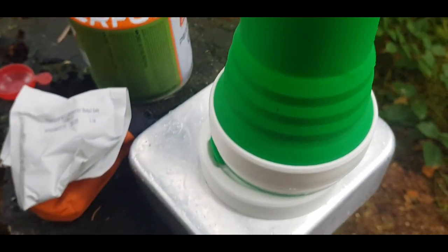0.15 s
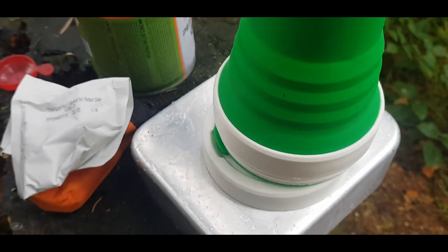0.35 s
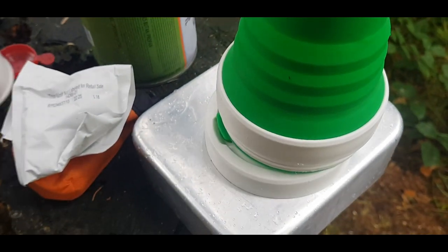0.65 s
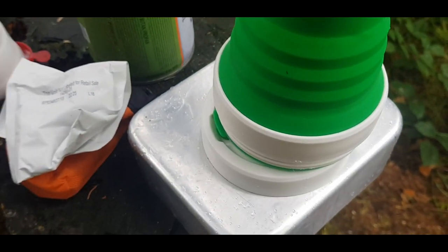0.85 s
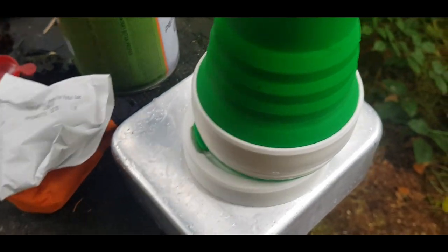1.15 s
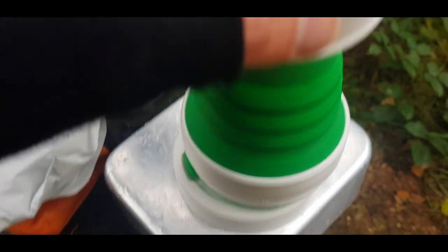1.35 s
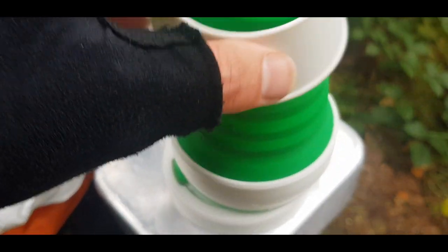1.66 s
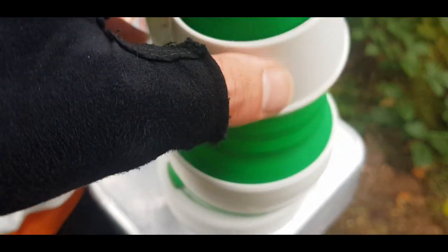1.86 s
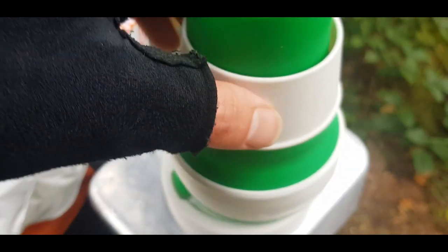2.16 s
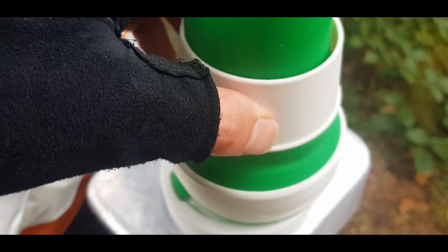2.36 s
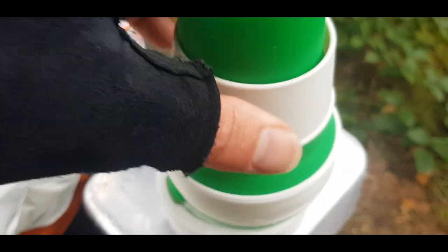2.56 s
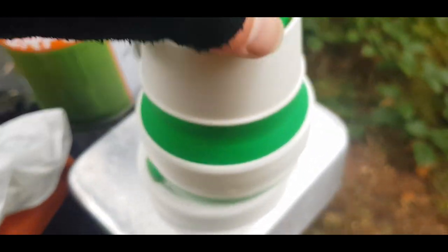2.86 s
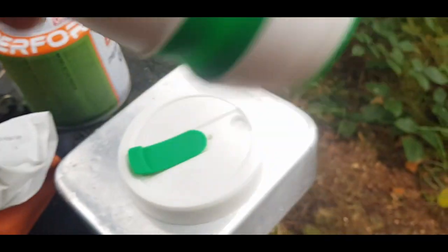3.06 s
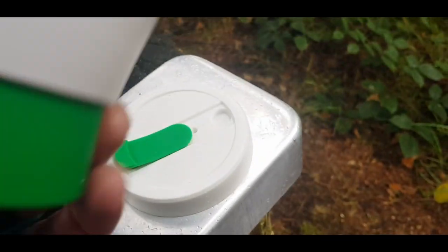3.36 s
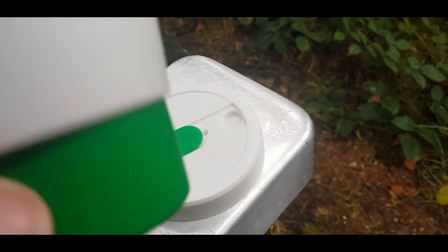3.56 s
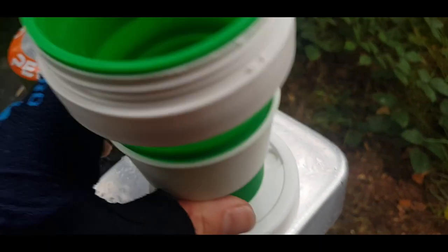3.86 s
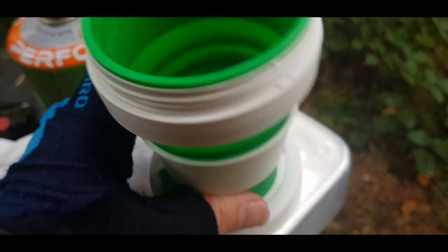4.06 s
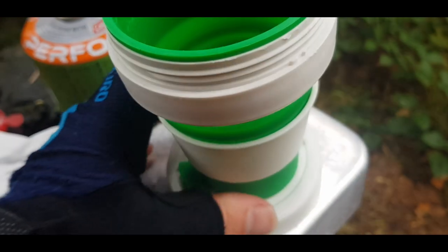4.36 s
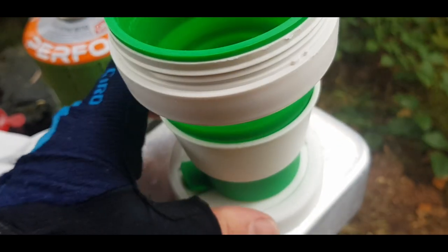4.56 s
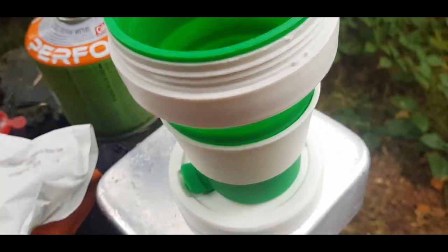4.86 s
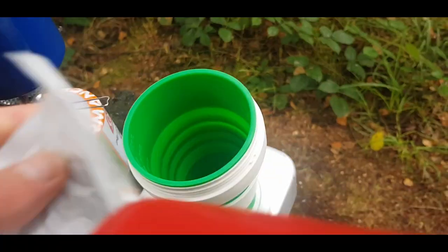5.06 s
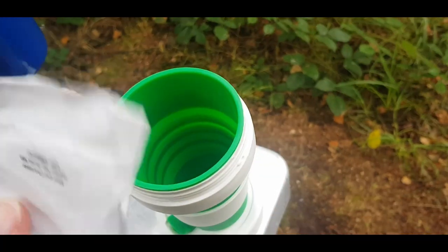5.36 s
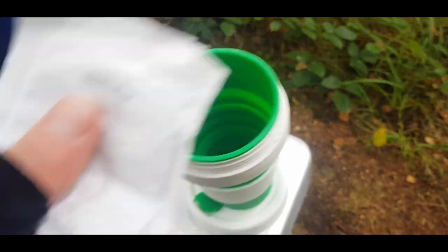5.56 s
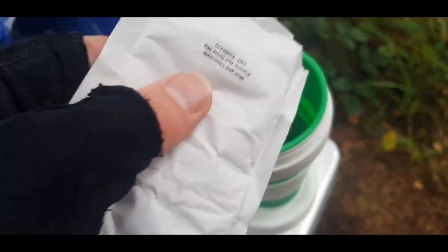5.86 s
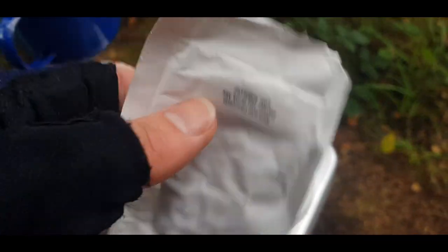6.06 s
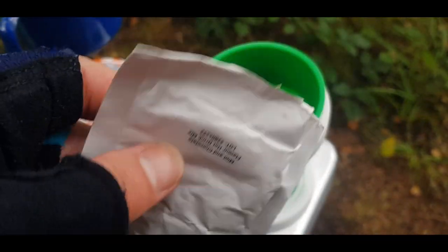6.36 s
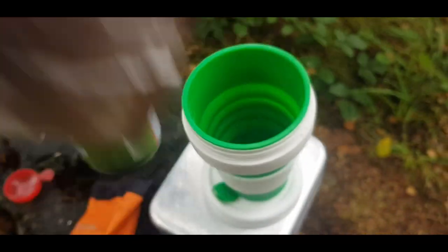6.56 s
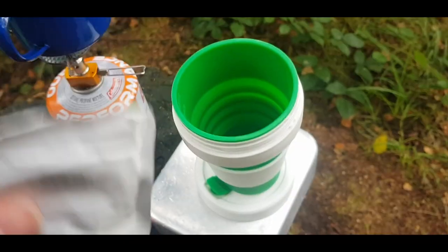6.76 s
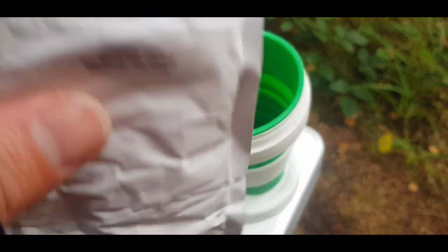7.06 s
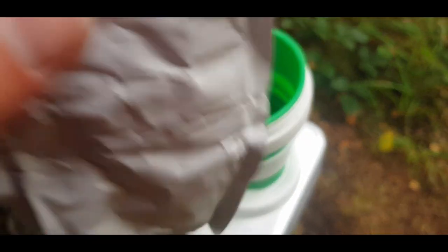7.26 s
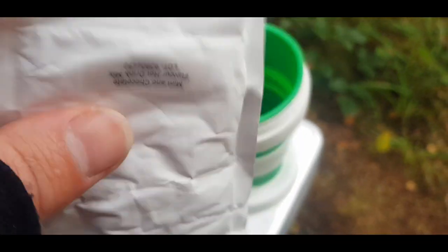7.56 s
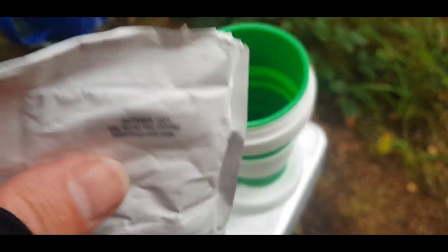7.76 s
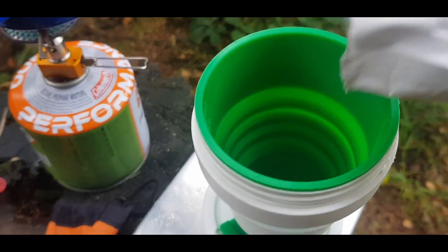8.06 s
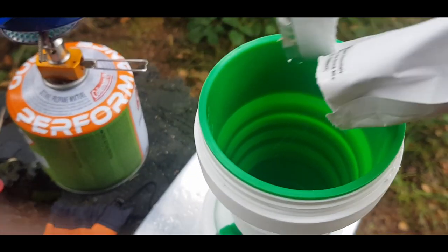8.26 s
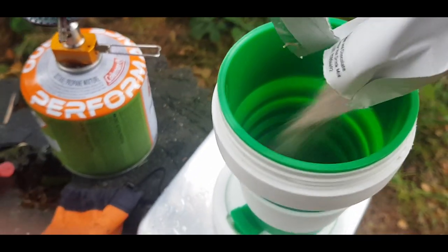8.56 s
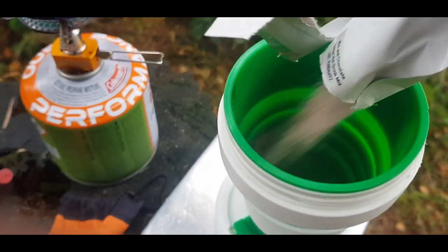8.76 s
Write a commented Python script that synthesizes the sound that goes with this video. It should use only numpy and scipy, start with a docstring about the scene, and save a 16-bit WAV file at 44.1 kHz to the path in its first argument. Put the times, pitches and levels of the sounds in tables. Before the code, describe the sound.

A folding plastic cup pops open and is set down with hollow knocks, then a paper sachet crackles sharply, is shaken and its powder poured, outdoors.

```python
"""Folding cup and paper sachet outdoors

Beside a faintly hissing stove, a folding cup opens with hollow pops and is set down: damped sines and noise ticks.
A paper sachet snaps and crinkles, is shaken so its powder swishes, and is poured out: short swings and noise grains.
Noise makes a distant rumble, a light breeze and dull hand bumps; a thin whistle comes and goes in spells.
Two close microphones hear each crackle at slightly different moments; the sound drops out briefly before the pour."""
import sys
import numpy as np
from scipy import signal
from scipy.fft import rfft, irfft
from scipy.io import wavfile
from scipy.ndimage import uniform_filter1d

SR = 44100
rng = np.random.default_rng(int(sys.argv[2]) if len(sys.argv) > 2 else 0)


def store_wav(level_fs):
    """Save 16-bit WAV to argv[1]."""
    pcm = np.round(np.clip(np.atleast_2d(level_fs), -1, 1) * 32767)
    wavfile.write(sys.argv[1], SR, pcm.T.astype(np.int16))


N = 393372
TIME = np.arange(N) / SR  # seconds

# Colour of the distant rumble: (frequency [Hz], level per Hz [dB])
RUMBLE_COLOUR = [(15, -96), (25, -24), (46, -10.5), (67, -4), (112, -8), (136, -1.5), (168, 0), (263, -7),
                 (306, -8.5), (366, -14), (647, -19.5), (786, -16.5), (900, -28.5), (1170, -30),
                 (1980, -120)]
# How wide the rumble is: (frequency [Hz], side relative to middle [dB])
RUMBLE_SIDE = [(30, -7), (60, -23), (110, -14), (180, -18.5), (380, -9.5), (800, -8)]
# Colour of the stove's hiss: (frequency [Hz], level per Hz [dB])
HISS_COLOUR = [(500, -18), (900, -1), (1400, 3), (2300, 0.5), (3500, -3), (5000, -4.5), (7000, -10),
               (8200, -6.5), (9200, -9.5), (12000, -11), (16000, -17.5)]
RUMBLE_DB, HISS_DB = -51, -56.5

# Spells of the thin background whistle: (time [s], hold [s], level [dB], pitch [Hz])
WHISTLE_SPELLS = [(0, 1.16, -58, 5570), (1.486, 0.24, -63.5, 5620), (2.149, 0.35, -61.5, 5560),
                  (2.717, 0.54, -62.5, 5700), (4.022, .6, -59.5, 5570), (4.849, 3.13, -58, 5760)]
# Breathy tones of the whistle: (multiple of its pitch [ratio], width [Hz], level [dB])
BREATHY_TONES = [(1, 520, -4.5), (1.42, 497, -23.5)]
WHISTLE_FADE_DB_PER_S = 54

# Soft bumps of the hands: (time [s], level [dB], pitch [Hz], length [s])
HAND_BUMPS = [(4.385, -48.5, 65, 0.021), (5.142, -38, 240, 0.01), (5.137, -48, 75, 0.033),
              (5.345, -40.5, 65, 0.025), (5.82, -50, 75, 0.013), (6.493, -47, 54.7, 0.028),
              (7.64, -46, 65, 0.015), (7.74, -46.5, 55, 0.026), (8.877, -53.5, 327, 0.037)]

# Folds of the cup popping open:
# (time [s], hollow level [dB], hollow pitch [Hz], wall level [dB], tick level [dB], tick pitch [Hz])
CUP_POPS = [(1.436, -43.5, 756, -58, -54, 1500), (1.703, -33.5, 640, -41, -31.5, 1390),
            (2.0762, -31.5, 597, -39, -35, 2600), (2.077, -46, 513, -53, -42, 5560),
            (2.079, -31.5, 460, -56, -27.5, 1640), (3.142, -49, 800, -49, -34, 5200),
            (3.1438, -15.5, 665, -25, -28, 5400)]
# Ringing of the cup's plastic wall: (frequency [Hz], level [dB], time to fall 60 dB [s])
WALL_TONES = [(824, -3, 0.031), (960, -4.5, 0.014), (1310, -19, 0.036), (1960, -15.5, 0.033),
              (2440, -21, 0.03), (2850, -21, 0.037)]
# The cup set down on its lid on a metal tin:
# (time [s], hollow level [dB], hollow pitch [Hz], tin level [dB], tick level [dB], tick pitch [Hz])
CUP_TOUCHES = [(4.0938, -18, 548, -25, -34, 2220), (4.097, -25, 580, -55, -43, 3960),
               (4.136, -33, 650, -55, -60, 2000), (4.279, -30.5, 620, -58, -60, 2000),
               (4.315, -35, 650, -51, -60, 2000)]
# Ringing of lid and tin: (frequency [Hz], level [dB], time to fall 60 dB [s])
TIN_TONES = [(792, -2, 0.062), (1020, -15, .025), (1130, -15, 0.046), (1465, -5, 0.058), (1590, -8, 0.095),
             (1660, -9, 0.06), (1820, -16, 0.051), (1990, -21, .04), (2420, -22, 0.095), (2800, -19, 0.044),
             (3970, -15.5, 0.016)]
# Gloved fingers sliding on the cup: (time [s], level [dB], length [s])
FINGER_SCUFFS = [(1.454, -59, 0.013), (1.674, -63, 0.03), (1.912, -55, 0.014), (2.12, -57.5, 0.067),
                 (3.14, -54.5, 0.036), (3.221, -53, 0.0087), (3.272, -59.5, 0.067), (3.423, -54, 0.02),
                 (3.546, -50, 0.011), (4.245, -50.5, 0.017), (4.334, -55.5, 0.024)]
# Colour of the hollow cup: (frequency [Hz], level per Hz [dB])
HOLLOW_COLOUR = [(300, -18), (520, -1.5), (660, -1), (820, 1), (1100, -14.5), (2000, -12), (4000, -30),
                 (9000, -34)]

# Where the hand holds the sachet: (time [s], lean to the left [dB], delay of the right ear [ms])
HAND_PLACE = [(5.0, -1, 0.25), (5.35, -3, 0.25), (5.65, -4, 0.23), (5.85, -5, 0.17), (6.12, -10, -.17),
              (6.57, -5, -0.22), (6.67, 3.5, 0), (6.76, -9.5, -0.14), (7.8, -9, -.13), (7.86, 6, 0.14),
              (8.92, -1, .12)]
# Creases that snap: (time [s], level [dB], pitch [Hz],
# splinters relative to the snap [dB], lean to the left relative to the hand [dB])
CREASE_SNAPS = [(4.997, -21.5, 4170, 11.5, 5), (5.012, -10, 2130, -24, -0.5), (5.085, -9, 2360, -13, -7),
                (5.099, -23, 4500, 12, 4), (5.145, -18, 3900, -4, -7), (5.1842, -2.5, 3240, -5.5, 7),
                (5.278, -16, 4000, -5, 0), (5.285, -10.5, 3000, -20, -17), (5.327, -2.5, 2160, -24, -6),
                (5.337, -11, 2600, -9, 18), (5.375, -22, 8000, -1, 4), (5.3836, -1.5, 3640, -10, 3),
                (5.3937, -20, 4500, -7, 7), (5.563, -26, 4200, 1, -2), (5.606, -32, 3000, -5, 2),
                (5.642, -17, 1590, -2, 3), (5.7128, -21.5, 3800, -3, -4), (5.759, -29, 5000, 11, -4),
                (5.795, -20, 3000, 0, -2), (5.828, -8.5, 2200, -1, 3), (5.836, -19, 4000, 2, -4),
                (5.868, -18, 4500, -15, 0), (5.9606, -29, 2600, 0, -3), (6.123, -9.5, 5070, -1, 3),
                (6.124, -13.5, 1650, -5, 9), (6.235, -14.5, 4850, 1, 0), (6.258, -26, 5000, 2, 5),
                (6.567, -27, 1300, -10, -2), (7.0338, -16.5, 3400, -2.5, 1), (7.122, -29, 2010, -8, 0),
                (7.295, -22, 2500, 0, 4), (7.536, -22, 1140, -2, 7), (8.4125, -28, 2300, -4, 2)]
# While the sachet is in the hand, small creases give way: (start [s], end [s])
HELD = (4.996, 7.85)
CREASES_PER_S, CREASE_DB, CREASE_SPREAD_DB = 5, -32, 2.0
CREASE_HZ, CREASE_SPLINTER_DB = 3400, -5

# Fingers squeezing the paper: (time [s], hold [s], level [dB], relative body [dB], relative crispness [dB])
PAPER_SQUEEZES = [(5.012, 0.093, -44, -6.5, 0.5), (5.145, 0.03, -46, -7.5, -2),
                  (5.198, 0.058, -45, -7, -0.5), (5.283, .04, -42, -4, -1), (5.327, 0.0027, -32, -8.5, -5),
                  (5.345, 0.035, -44, -17, 6.5), (5.402, 0.016, -39.5, -12.5, 1.5),
                  (5.459, 0.021, -52.5, -5, 1), (5.49, 0.028, -45, -24, -5), (5.563, .015, -52.5, 1, 4),
                  (5.608, 0.042, -47, -3.5, 1.5), (5.655, 0.024, -45.5, -8, -6),
                  (5.76, 0.039, -48.5, -7, 1), (5.794, 0.048, -42.5, -7, -2.5),
                  (5.802, 0.017, -38, 0.5, -0.5), (5.96, 0.005, -46.5, -8, -8),
                  (6.035, .045, -53, -5, -0.5), (6.288, 0.0061, -54.5, 1, -1),
                  (6.423, .014, -50.5, -8, -2.5), (6.465, 0.046, -58.5, -18, 6.5),
                  (7.292, 0.013, -51.5, -4.5, -6), (7.831, .009, -56.5, 4.5, 3),
                  (7.864, 0.068, -59.5, -8, 4.5)]
# Paper merely lying in the fingers: (level [dB], relative body [dB], relative crispness [dB])
LIGHT_HOLD = (-58.5, -9.5, -2.5)
GRIP_DB_PER_S, RELAX_DB_PER_S = 2000, 400  # rise and fall of a squeeze
# Colour of the crumpled paper: (frequency [Hz], level per Hz [dB])
PAPER_COLOUR = [(240, -42), (400, -13), (687, -8), (730, -7.5), (979, -3.5), (1840, -2), (2220, -7),
                (2750, -5.5), (3990, 0.5), (6740, -9.5), (12500, -3.5), (15000, -9), (16000, -14.5)]

# Powder sliding at each shake: (middle [s], width [s], level [dB], relative crispness [dB])
POWDER_SHAKES = [(6.605, 0.023, -50, 0), (6.681, 0.018, -35.5, 7.5), (6.755, 0.022, -39.5, 4),
                 (6.79, 0.046, -51, 0.5), (6.935, 0.036, -52, 2.5), (7.08, 0.031, -51, -0.5),
                 (7.206, 0.033, -50, 0.5), (7.363, 0.018, -44.5, 3.5), (7.47, 0.016, -43, 3),
                 (7.518, 0.014, -39.5, 4), (7.55, 0.023, -50, 1)]
# Colour of the shaken powder: (frequency [Hz], level per Hz [dB])
POWDER_COLOUR = [(240, -36), (400, -20), (697, -14.5), (753, -18), (949, -12), (1490, -10.5), (1580, -18.5),
                 (4240, 3.5), (7170, -4.5), (12100, 3), (15000, -1), (16000, -8)]
SOFT_SHAKE_DB, SHAKE_BODY_DB = -51, -8.5  # a soft shake and its relative body
BODY_LAG = 0.16  # share of extra force, in dB, that the body does not follow

# Flow of the poured powder: (time [s], level [dB])
POWDER_FLOW = [(7.95, -68), (8.17, -66.5), (8.25, -59), (8.36, -56), (8.44, -61), (8.53, -54),
               (8.62, -57.5), (8.68, -53.5), (8.83, -52.5), (8.92, -51.5)]
# Clumps sliding out with the stream: (middle [s], width [s], level above the flow [dB])
POWDER_CLUMPS = [(8.535, 0.0072, 4), (8.664, .008, 4), (8.758, .008, 4), (8.836, 0.014, 4.5)]
# Colour of the poured stream: (frequency [Hz], level per Hz [dB])
STREAM_COLOUR = [(240, -37), (400, 4), (789, 0.5), (1010, -1), (1250, -17), (1680, -1.5), (2400, -7.5),
                 (3420, -4), (5600, -8), (12100, -4.5), (16000, -9)]
POUR_BODY_DB, POUR_CRISP_DB = -5, 7

# The sound drops out for an instant: (start [s], end [s])
SILENT_GAP = (7.846, 7.863)
CUTOFF_HZ = 15900


def from_db(db):
    """Turn decibels into gain."""
    return 10 ** (np.asarray(db) / 20)


def unit(x):
    """Scale a stereo pair so that its middle (the average of both sides) has rms 1."""
    return x / np.sqrt(np.mean(x.mean(axis=0) ** 2) + 1e-20)


def panned(pan_db):
    """Left and right gains of constant power; positive leans left."""
    gains = from_db(np.array([[.5], [-.5]]) * pan_db)
    return gains / np.sqrt(np.mean(gains ** 2, axis=0))


def drift(rate):
    """A smooth random wander of spread 1, slower than rate in Hz."""
    lowpass = signal.butter(2, rate, fs=SR, output="sos")
    slow = signal.sosfilt(lowpass, rng.standard_normal(N + SR))[SR:]  # skip the filter's start
    return slow / slow.std()


def band(x, low_hz, high_hz, order=2):
    """Keep one band of frequencies, using only past sound."""
    edges = [low_hz, min(high_hz, SR / 2 - 100)]
    return signal.sosfilt(signal.butter(order, edges, "band", fs=SR, output="sos"), x + 1e-18)


def coloured(x, spectrum, size=8192):
    """Minimum-phase filter with the given spectrum: nothing sounds early."""
    hz, db = np.transpose(spectrum)
    grid = np.maximum(np.arange(size // 2 + 1) * SR / size, 1)
    level_db = np.interp(np.log(grid), np.log(hz), db)
    # Folding the cepstrum forward puts the filter's response after its start
    cepstrum = irfft(np.log(from_db(level_db)))
    cepstrum[1:size // 2] *= 2
    cepstrum[size // 2 + 1:] = 0
    response = irfft(np.exp(rfft(cepstrum)))
    return signal.fftconvolve(x, response[None], axes=1)[:, :N]


def ring(t, hz, t60):
    """A damped sine that starts at t = 0 and falls 60 dB in t60 seconds."""
    t = np.maximum(t, 0)
    return np.sin(2 * np.pi * hz * t) * from_db(-60 * t / t60)


def add(out, s, sound):
    """Mix a short stereo sound in at s seconds."""
    at = int(s * SR)
    out[:, at:at + sound.shape[1]] += sound[:, :N - at]


def plateau(s, hold, rise_db_per_s, fall_db_per_s):
    """Attack, hold and release, as a level in dB relative to the top."""
    before = np.maximum(s - TIME, 0)
    after = np.maximum(TIME - s - hold, 0)
    return np.maximum(-200, -rise_db_per_s * before - fall_db_per_s * after)


def bell(s, width):
    """A smooth swell of height 1 around s."""
    return np.exp(-.5 * np.minimum(((TIME - s) / width) ** 2, 60))


def grains(per_s, spread_db, smooth_db, count=17):
    """Tiny uneven clicks, each with its own delay between the ears, on smooth friction noise."""
    chance, size = rng.random(N), rng.exponential(1, N)
    sign, lag = rng.choice([-1, 1], N), rng.integers(-count, count, N)  # lag in samples
    left = (chance < per_s / SR) * from_db(spread_db * np.minimum(size, 4)) * sign
    right = np.bincount((np.arange(N) + lag) % N, left, N)
    friction = unit(rng.standard_normal((2, N)))
    return unit(np.array([left, right])) + from_db(smooth_db) * friction


def outdoors(hiss_pan_db=-2.0, waver_db=1.22, breeze_db=-67, gust_db=0.5):
    """Far rumble, much alike in both ears, a light breeze on each microphone, and the stove's wide hiss."""
    mid, side = rng.standard_normal((2, 1, N))
    rumble = unit(coloured(mid + coloured(side, RUMBLE_SIDE) * [[1], [-1]], RUMBLE_COLOUR))
    rumble = rumble * from_db(RUMBLE_DB + waver_db * drift(9.4))
    breeze = unit(band(rng.standard_normal((2, N)), 43, 110))
    breeze = breeze * from_db(breeze_db + gust_db * drift(2.2))
    hiss = from_db(HISS_DB) * unit(coloured(rng.standard_normal((2, N)), HISS_COLOUR))
    # The top of the hiss leans left, the rest right
    top = band(hiss, 6900, 15600, order=1)
    return rumble + breeze + (hiss - top) * panned(hiss_pan_db) + top * panned(pan_db=4.5)


def whistle(wander_hz=60, waver_db=1.3):
    """Narrow bands of hiss that come in spells, each at its own slightly wandering pitch."""
    fade = WHISTLE_FADE_DB_PER_S
    spells = np.array([from_db(db + plateau(s, hold, fade, fade)) for s, hold, db, _ in WHISTLE_SPELLS])
    # The loudest spell has most say in the pitch
    pitch = np.array(WHISTLE_SPELLS)[:, 3] @ spells / spells.sum(axis=0)
    pitch = pitch + wander_hz * drift(rate=2.5)
    out = 0
    for multiple, width_hz, db in BREATHY_TONES:
        flutter = band(rng.standard_normal((2, N)), 15, width_hz / 2)
        tone = np.sin(2 * np.pi * np.cumsum(multiple * pitch) / SR)
        out = out + from_db(db) * unit(flutter * tone)
    return out * spells.max(axis=0) * from_db(waver_db * drift(rate=5.5))


def bumps():
    """Moving hands push short dull puffs of air at the microphones: low noise under a bell shape."""
    out = np.zeros((2, N))
    for s, db, hz, length in HAND_BUMPS:
        t = TIME[:SR // 4] - 1 / 8  # the puff peaks at t = 0
        air = rng.standard_normal((2, len(t)))
        puff = unit(band(air, hz * 0.68, hz * 1.44)) * np.exp(-.5 * (t / length) ** 2)
        add(out, s + t[0], from_db(db) * puff)
    return out


def knocks(blows, modes, hollow_t60, give_s, tick_t60, crack_db, spread_db=3.0):
    """Each blow pops the air in the cup, rings the stiff parts and ticks the hard plastic."""
    out, t = np.zeros((2, N)), TIME[:SR // 6]
    for s, hollow_db, hz, ring_db, tick_db, tick_hz in blows:
        hollow = from_db(hollow_db) * ring(t, hz, hollow_t60) * (1 - np.exp(-t / give_s))
        stiff = 0
        for k, (mode_hz, db, t60) in enumerate(modes):
            level_db = ring_db + db + spread_db * rng.standard_normal()
            stiff = stiff + from_db(level_db) * ring(t, mode_hz, t60) * (-1) ** k
        grit = rng.standard_normal((2, len(t))) * from_db(-60 * t / tick_t60)
        crack = from_db(crack_db) * band(grit, tick_hz * 1.2, tick_hz * 2.2, order=1)
        tick = from_db(tick_db) * (3.25 * band(grit, tick_hz * 0.87, tick_hz * 1.14) + crack)
        add(out, s, (hollow + stiff + tick) * panned(pan_db=-2.2))
    return out


def cup():
    """The cup is unfolded and set down with knocks; gloved fingers rub it with grains of friction."""
    pops = knocks(CUP_POPS, WALL_TONES, hollow_t60=0.039, give_s=0.001, tick_t60=0.023, crack_db=-3.5)
    touches = knocks(CUP_TOUCHES, TIN_TONES, hollow_t60=0.034, give_s=0.0024, tick_t60=0.076, crack_db=-7)
    sliding = sum(from_db(db) * bell(s, length) for s, db, length in FINGER_SCUFFS)
    friction = unit(coloured(grains(per_s=1100, spread_db=3.0, smooth_db=-17), HOLLOW_COLOUR))
    return pops + touches + sliding * friction


def place(s):
    """Lean to the left in dB and right-ear delay in ms of the sachet at time s."""
    times, pan_db, late_ms = np.transpose(HAND_PLACE)
    return np.interp(s, times, pan_db), np.interp(s, times, late_ms)


def small_creases(pitch_spread=.3, pan_spread_db=5.0):
    """Faint snaps at random moments, with the same columns as the loud ones."""
    draws = rng.standard_normal((60, 3))
    moments = rng.uniform(*HELD, len(draws))
    count = int(CREASES_PER_S * (HELD[1] - HELD[0]))
    creases = []
    for s, (louder, higher, aside) in zip(moments[:count], draws):
        db = CREASE_DB + CREASE_SPREAD_DB * louder
        hz = CREASE_HZ * np.exp(pitch_spread * higher)
        creases.append((s, db, hz, CREASE_SPLINTER_DB, pan_spread_db * aside))
    return creases


def snaps(cycles=3.94, splinter_t60=0.0069, flap_db=-20, flap_t60=0.018):
    """A crease buckles: one very short swing of the sheet, a weak flap, and a spray of fibre clicks."""
    out, t = np.zeros((2, N)), TIME[:SR // 25]
    for s, db, hz, splinter_db, aside_db in CREASE_SNAPS + small_creases():
        pan_db, late_ms = place(s)
        delay_ms = np.array([[max(-late_ms, 0)], [max(late_ms, 0)]])  # left ear, right ear
        heard = np.maximum(t - delay_ms / 1000, 0)
        swing = 2.2 * ring(heard, hz, cycles / hz) * (1 - np.exp(-heard * hz * 2))
        swing = band(swing, 640, 27000, order=1)
        grit = rng.standard_normal((2, 2, len(t))) * (heard > 0)
        flap = from_db(flap_db) * 2 * band(grit[0], hz * 0.52, hz * 1.06)
        flap = flap * from_db(-60 * heard / flap_t60)
        splinters = from_db(splinter_db) * 0.32 * band(grit[1], 2000, 20000, order=1)
        splinters = splinters * from_db(-60 * heard / splinter_t60)
        add(out, s, from_db(db) * (swing + flap + splinters) * panned(pan_db + aside_db))
    return out


def together(strokes):
    """Zone gains of overlapping strokes (envelope, dB, body dB, crispness dB); their powers add."""
    envelopes = np.array([envelope for envelope, *_ in strokes])
    gains = from_db([(db + body, db, db + crisp) for _, db, body, crisp in strokes])
    return np.sqrt(gains.T ** 2 @ envelopes ** 2)


def rustle(zone_gains, spectrum, source, flutter_db, flutter_hz, treble_left_db, zone_db):
    """Grains sound through the paper, with one gain each for body, middle and crisp top."""
    sound, pan = coloured(source, spectrum), place(TIME)[0]
    # (low [Hz], high [Hz], extra lean to the left [dB])
    zones = [(450, 2500, 0), (2500, 7000, 0), (7000, 17000, treble_left_db)]
    out = 0
    for (low, high, lean), gain, db in zip(zones, zone_gains, zone_db):
        zone = unit(band(sound, low, high, order=4))
        out = out + zone * gain * from_db(db) * panned(pan + lean)
    return out * from_db(flutter_db * drift(flutter_hz))


def crumpling():
    """Coarse crackle: each squeeze rises fast, holds and relaxes, over the faint rustle of holding."""
    grips = PAPER_SQUEEZES + [(HELD[0], HELD[1] - HELD[0], *LIGHT_HOLD)]
    gains = together([(from_db(plateau(s, hold, GRIP_DB_PER_S, RELAX_DB_PER_S)), *tone)
                      for s, hold, *tone in grips])
    crackle = grains(per_s=1800, spread_db=0.5, smooth_db=-2.5)
    return rustle(gains, PAPER_COLOUR, crackle, flutter_db=1.95, flutter_hz=90,
                  treble_left_db=5.0, zone_db=[-.5, -.5, -.5])


def shaking():
    """Finer swishes of powder that swell and fade; hard shakes gain more treble than body."""
    strokes = []
    for s, width, db, crisp in POWDER_SHAKES:
        body = SHAKE_BODY_DB - BODY_LAG * (db - SOFT_SHAKE_DB)
        strokes.append((bell(s, width), db, body, crisp))
    powder = grains(per_s=3900, spread_db=5.0, smooth_db=2)
    return rustle(together(strokes), POWDER_COLOUR, powder, flutter_db=1.4, flutter_hz=70.1,
                  treble_left_db=8.0, zone_db=[-.8, -.3, -.3])


def pouring():
    """A thin stream of powder, made of dense grains, that grows, with a few clumps."""
    flow_db = np.interp(TIME, *np.transpose(POWDER_FLOW), left=-np.inf)  # silent before the pour
    flow_db = flow_db + sum(db * bell(s, width) for s, width, db in POWDER_CLUMPS)
    gains = together([(from_db(flow_db), 0, POUR_BODY_DB, POUR_CRISP_DB)])
    powder = grains(per_s=7000, spread_db=4.5, smooth_db=1.5)
    return rustle(gains, STREAM_COLOUR, powder, flutter_db=0.5, flutter_hz=25,
                  treble_left_db=7.5, zone_db=[-1.5, -.5, -.3])


def sachet():
    """The sachet is crumpled, shaken and poured out."""
    return crumpling() + shaking() + pouring()


def scene():
    """Everything is dry in the open air: the layers are added without any echo."""
    return outdoors() + whistle() + bumps() + cup() + snaps() + sachet()


def record(dry):
    """The sound drops out for an instant before the pouring, and the top is cut."""
    start, end = SILENT_GAP
    live = uniform_filter1d(1.0 * ((TIME < start) | (TIME > end)), size=100)  # softened edges
    lowpass = signal.ellip(12, .1, 80, CUTOFF_HZ, fs=SR, output="sos")
    return signal.sosfilt(lowpass, dry * live)


dry = scene()
out = record(dry)
store_wav(out)
```